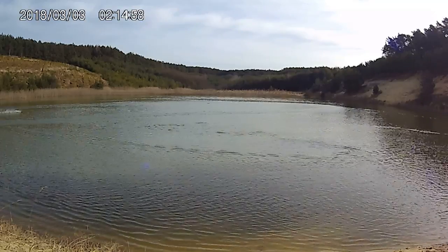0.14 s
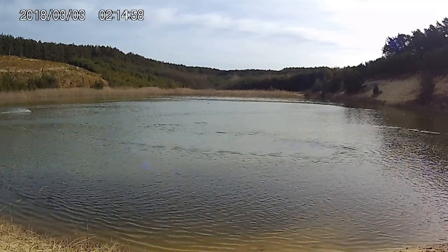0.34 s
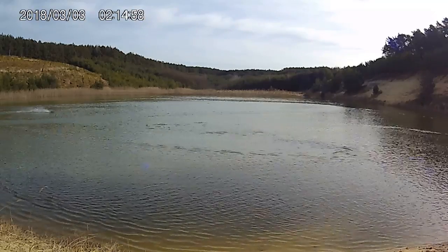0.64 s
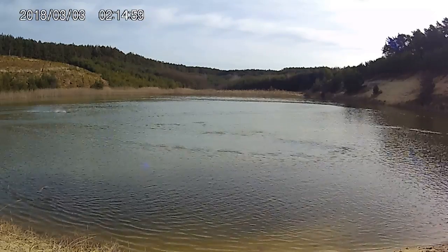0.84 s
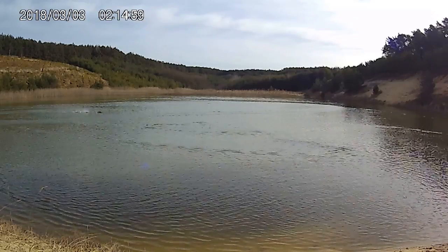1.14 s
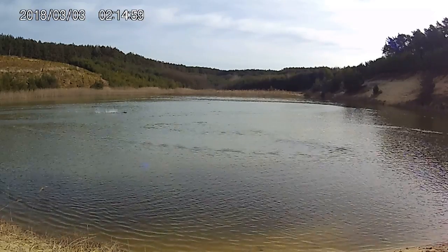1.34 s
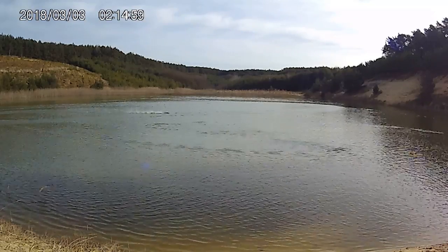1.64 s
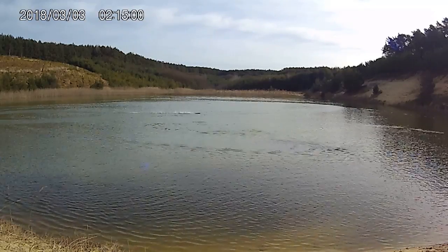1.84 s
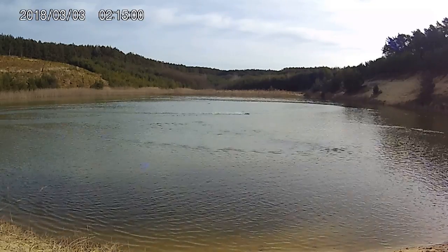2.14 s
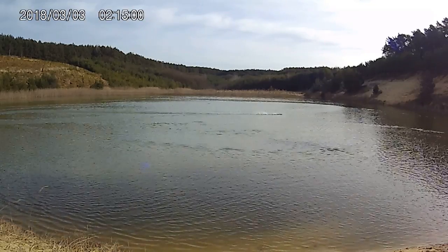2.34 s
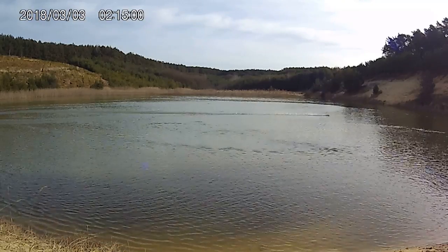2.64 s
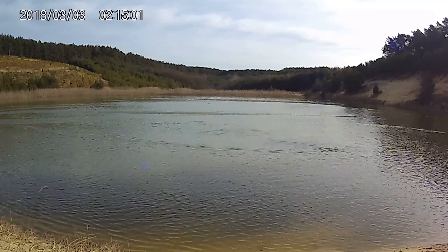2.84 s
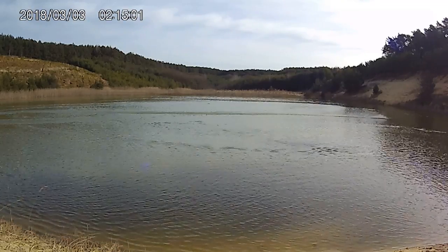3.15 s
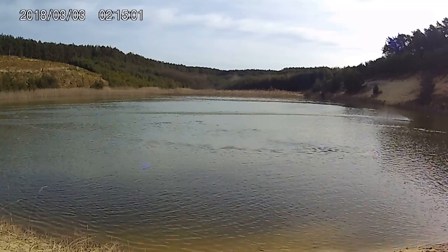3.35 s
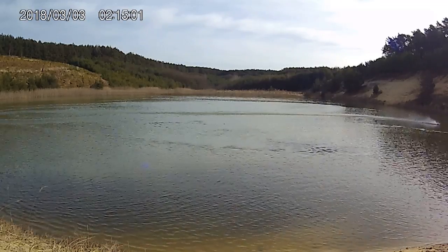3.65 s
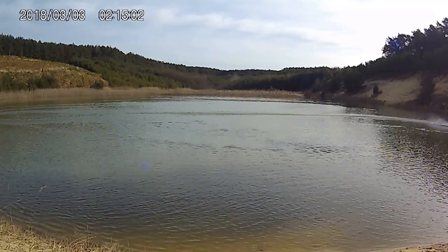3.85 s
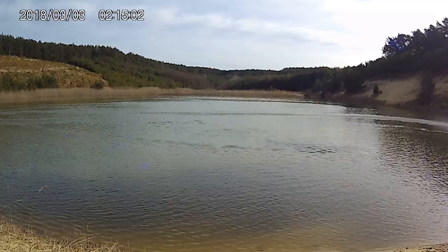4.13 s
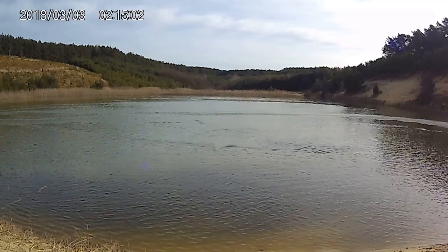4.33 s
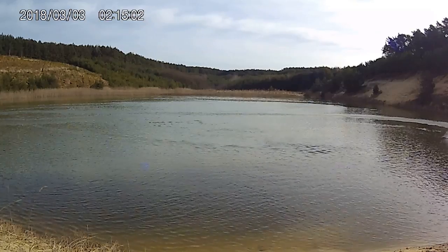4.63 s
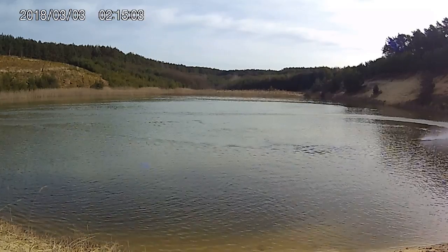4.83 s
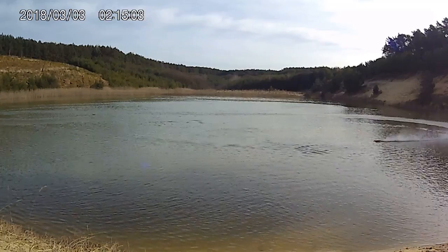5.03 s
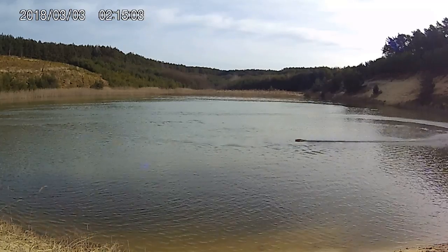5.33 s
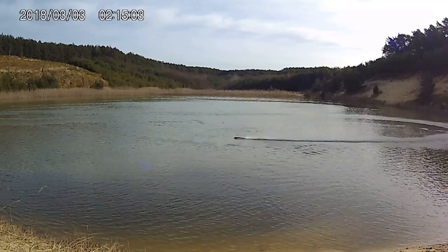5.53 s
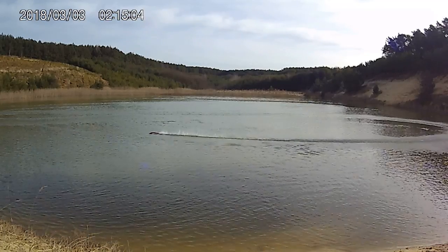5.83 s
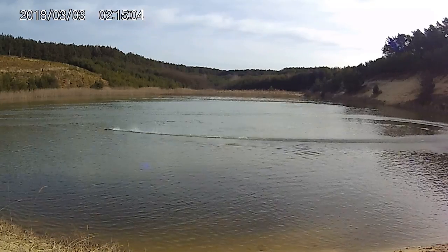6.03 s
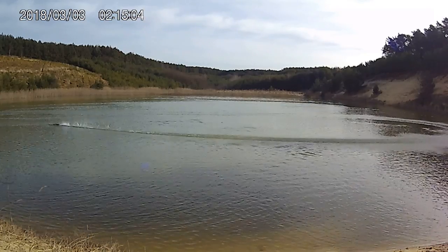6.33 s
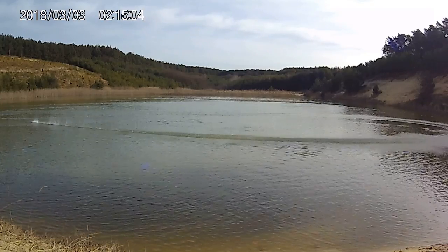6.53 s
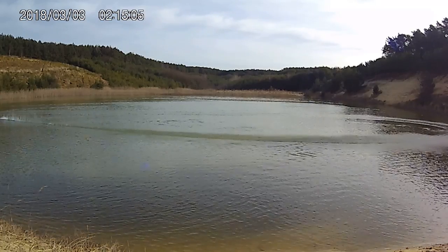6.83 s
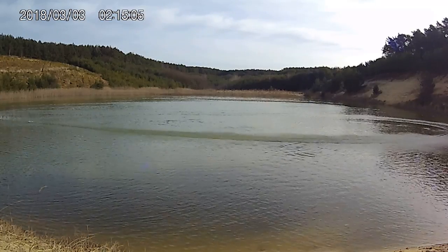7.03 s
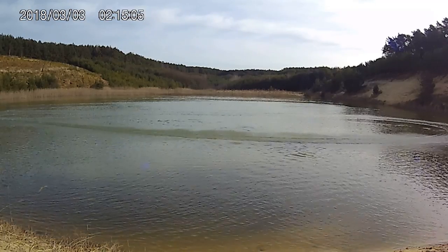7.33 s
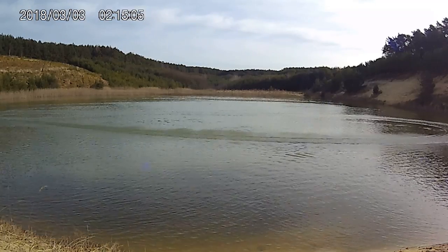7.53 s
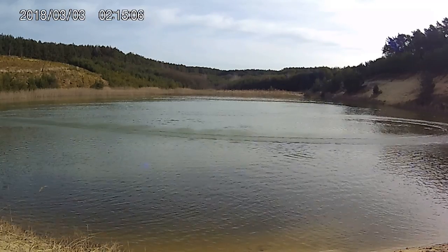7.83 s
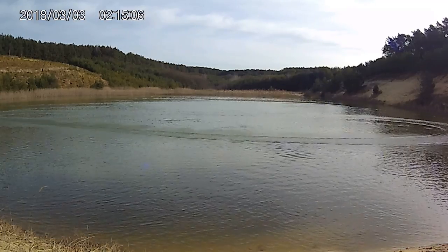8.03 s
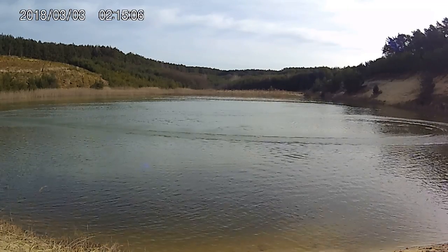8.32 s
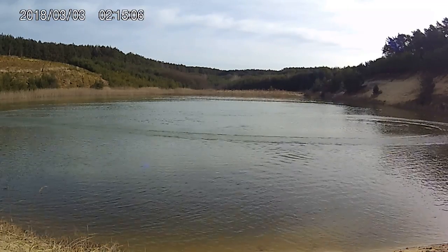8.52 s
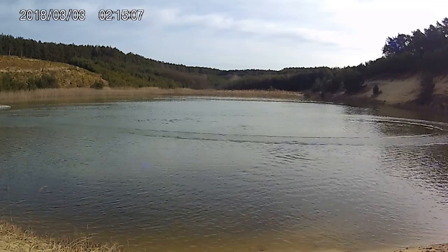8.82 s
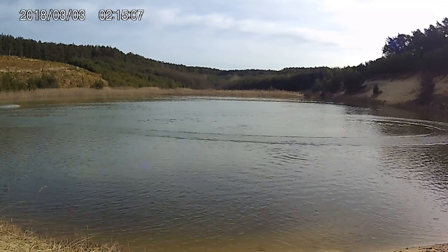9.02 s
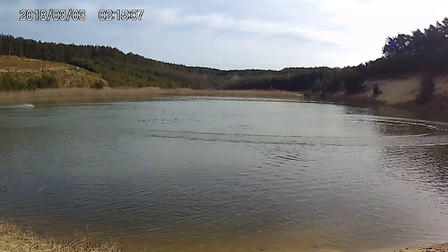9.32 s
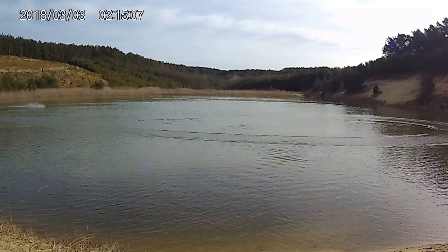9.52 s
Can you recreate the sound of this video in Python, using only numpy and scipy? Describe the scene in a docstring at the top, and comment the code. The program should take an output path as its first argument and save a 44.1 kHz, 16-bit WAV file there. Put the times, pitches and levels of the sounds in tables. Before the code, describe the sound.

Heard from a lake shore through a small camera microphone, a model boat's electric motor whines with a raspy, watery edge. It stutters rapidly as the hull hops, drops in pitch through a turn, then surges back louder and shriller as it passes nearest. It recedes to a low, faint drone and finally climbs again, over soft air hiss and a dull echo from the hills.

```python
"""On a lake among wooded hills, an electric model speedboat runs laps, heard from the shore through a small camera mic.
The half-submerged propeller whines at the shaft rate and its multiples; each blade stroke tears up noisy wash.
As the hull hops, the unloaded motor revs up, then the blades bite again with a splash and mostly a louder tone.
Droplets of spray patter as bright noise, the hills return a dull, scattered echo, and still air adds a soft hiss."""
import sys
import numpy as np
from scipy import signal
from scipy.fft import rfft, irfft, next_fast_len
from scipy.io import wavfile
from scipy.ndimage import uniform_filter1d

SR = 44100
rng = np.random.default_rng(int(sys.argv[2]) if len(sys.argv) > 2 else 0)


def wav_out(sig):
    """Save sig, one row per channel (or a flat mono array), as 16-bit PCM at SR to the path in sys.argv[1]."""
    wavfile.write(sys.argv[1], SR, np.round(np.clip(np.atleast_2d(sig).T, -1, 1) * 32767).astype(np.int16))


N = 426447
T = np.arange(N) / SR

# motor speed with the propeller in the water, slow in turns, fast on straights: t/s, shaft rate f/Hz
THROTTLE = [(0, 467), (.37, 495.4), (.55, 706.6), (.76, 701.6), (1.3, 743), (2.1, 793), (2.47, 771.7),
            (2.6, 536), (2.78, 428), (3.05, 564.4), (3.24, 611.6), (3.44, 546), (3.78, 529), (3.99, 570.3),
            (4.15, 652.5), (4.25, 654.5), (4.35, 711), (4.62, 750), (4.68, 734.4), (4.78, 669.3),
            (4.93, 646.6), (4.99, 734.4), (5.35, 757.8), (5.72, 781.5), (6.1, 765.4), (6.91, 748),
            (7.02, 611.4), (7.27, 611), (7.7, 507.4), (8.39, 484.9), (8.71, 504), (8.83, 541),
            (9.32, 558.6), (9.42, 693.7), (9.67, 722)]
# the boat comes and goes: t/s, boat level/dB, tones against wash level/dB, shaft tone gain level/dB
PASSES = [(0, -44, -1, -0.5), (.75, -42, 1.5, -6), (1.25, -41.5, -6, 5.5), (1.6, -39.5, 2, 0),
          (2.55, -39, -1.5, 2), (2.82, -45, -3.5, -9.5), (3.2, -39, 1.5, 5), (3.55, -38.5, -5, -8.5),
          (4.2, -41.5, 1, -11), (4.5, -32.5, -3.5, -5), (4.88, -36, 1, -3), (5.15, -30.5, 1.5, -13.5),
          (5.45, -31, -2, 2.5), (5.75, -34.5, -2.5, 4), (6.5, -41.5, -2.5, 2.5), (7.0, -41, -3.5, -0.5),
          (7.5, -45, 0, -10.5), (7.8, -45, -6.5, -4.5), (8.6, -45.5, -4.5, -0.5), (8.85, -44.5, 0.5, -0.5),
          (9.28, -45, -7, 6.5), (9.67, -44.5, 7.5, -12.5)]
# shrillest where the boat heads for the shore: t/s, upper orders gain level/dB, wash treble gain level/dB
HEADING = [(0, -18, -2.5), (.5, -4, -5), (.95, 0, 3.5), (1.75, -6.5, 2), (2.45, 0, -7.5), (2.9, 3, -6),
           (3.3, 6, 0), (3.75, 6, 12), (4.15, 3, 6.5), (4.6, 8, 3.5), (5.2, 4.5, -2.5), (5.7, 0.5, 1),
           (6.3, 1, 7.5), (6.9, -0.5, 9.5), (7.7, -8.5, -1.5), (8.6, -5.5, -2), (9.2, -2.5, -6),
           (9.67, 0, 7.5)]
# blades biting into the water, mostly after a hop of the hull:
# bite start t/s, bite end t/s, rev-up before it f/Hz, tone gain level/dB, splash gain level/dB, roughness (0-1)
HOPS = [(0.212, .242, 0, 10, -6.5, 0.14), (0.841, 0.897, 160, 5, 5.5, .4), (.93, 0.998, 130, 4.5, 6, 0.54),
        (1.043, 1.08, 89.5, 13.5, 4.5, 0.37), (1.118, 1.176, 124.5, 11, 6, 0.6),
        (1.265, 1.367, 220, 17, 9, 0.32), (1.379, 1.404, 55, 12.5, 7, .45),
        (1.5, 1.592, 215, 11.5, 7.5, 0.24), (1.638, 1.735, 85, 11, 10, 0.46),
        (1.829, 1.94, 160, 15.5, 6, 0.17), (1.973, 2.02, 105, 14.5, 11, .4),
        (2.062, 2.229, 88, 12.5, 10.5, 0.6), (2.317, 2.382, 170, 15, 10.5, 0.39),
        (2.428, 2.491, 92.5, 15, 5.5, 0.22), (2.581, 2.87, -2, -1, 3, 0.26), (2.917, 2.956, 10, 7, 4, .05),
        (3.057, 3.19, 0, 3, 0, 0.04), (3.244, 3.32, 8, 3, 5, 0.21), (4.12, 4.255, 0, 8, 6, 0),
        (4.294, 4.328, 58, 4.5, 5, 0.11), (4.393, 4.408, 88, -3.5, 1.5, 0.12),
        (4.481, 4.499, 108.5, -9.5, 3.5, .1), (4.556, 4.57, 78, 2.5, -1, 0.2),
        (4.574, 4.606, 0, 12.5, -4.5, 0.02), (4.65, 4.687, 82, 1, 2, 0.06),
        (4.693, 4.855, 0.5, 5.5, 3, 0.01), (4.909, 4.946, 42, -1.5, 2.5, .05),
        (5.008, 5.027, 82, 12.5, 1.5, 0.1), (5.072, 5.097, 91.5, 0.5, 10, .25),
        (5.129, 5.158, 41.5, 6.5, -4, .05), (5.201, 5.248, 31, 5.5, -2, 0.11),
        (5.293, 5.317, 32, 9, -3, 0.1), (5.417, 5.448, 42.5, -3, -3.5, .2),
        (5.502, 5.52, 24.5, 2.5, -1.5, .2), (5.578, 5.586, 78.5, 14, -3, 0),
        (5.643, 5.667, 55, 19.5, -7, .2), (5.858, 5.936, 55, 13.5, 3.5, .1),
        (5.967, 6.007, 80.5, 15.5, 2.5, 0.21), (6.075, 6.172, 134.5, 17.5, 7, 0.02),
        (6.221, 6.317, 54, 17, 7.5, 0.03), (6.352, 6.39, 52.5, 14, 5, 0.08),
        (6.432, 6.477, 54.5, 20, 4.5, 0.12), (6.582, 6.648, 160, 16.5, 6.5, 0.01),
        (6.677, 6.695, 25, 10, -1, 0.14), (6.751, 6.832, 85, 13.5, 1.5, 0.23),
        (6.869, 6.967, 69.5, 15, 1.5, 0), (7.148, 7.201, 66, -1, 3, 0.18), (7.274, 7.307, 32, 9, -6, 0.1),
        (7.343, 7.38, -0.5, 6.5, -4, .12), (7.538, 7.583, 19, 3, 4, 0.09), (8.43, 8.494, 14.5, 6.5, 5.5, 0),
        (8.801, 8.86, 8, 4.5, 1, .05), (9.444, 9.488, 39, 4, 7, .15), (9.58, 9.621, 60.5, 2.5, 7, .3)]
# upper orders of the whine: multiple of the shaft rate, level/dB
OVERTONES = [(5, -6.5), (6, -8.5), (7, -11.5), (8, -12), (9, -14.5)]
# how well the hull radiates each tone: f/Hz, level/dB
HULL_RESONANCES = [(450, -28), (550, -21), (620, -19), (700, -14), (780, -8), (870, -4), (980, -7),
                   (1100, 0.5), (1300, 2), (1520, -1), (1750, -5), (2050, 2.5), (2350, -2.5), (2700, -4),
                   (3100, -3.5), (3600, -11.5)]
# tone colour of the upper orders: f/Hz, level/dB
OVERTONE_COLOUR = [(2000, -1), (2750, 2), (3250, -15.5), (3550, -14), (4000, -12), (4300, -19),
                   (4650, -32.5), (5400, -42.5), (6000, -63)]
# relative noise spectra of the wash, the spray and the still air: f/Hz, level/dB per Hz
WASH_COLOUR = [(150, -64), (350, -44), (500, -30), (700, -10.5), (1000, -3), (1400, 3), (2050, 4.5),
               (2500, 0), (3100, -1.5), (3500, -15.5), (4100, -22.5), (4500, -27), (5400, -36), (6100, -67)]
SPRAY_COLOUR = [(4000, -12.5), (5400, 9.5), (6000, -13.5), (6500, 5), (7100, 0), (8000, -19.5), (8800, -3),
                (9600, 1.5), (11000, 6), (12500, 0), (15500, -10.5)]
AIR_COLOUR = [(20, -16), (60, -4.5), (87, -4), (110, -5.5), (210, -2), (400, 6), (1000, 13.5), (4000, -14),
              (7000, -27)]

FULL_SPEED_HZ = 800  # shaft rate that counts as full speed
FREE_REV_HZ = 107  # rev-up at which the propeller is wholly clear of the water
AIR_S = .075  # longest time in the air for a hop with a 160 Hz rev-up
TOUCH_S = 0.01177  # the blade tips touch the water this long before they bite
BRAKE_S = .035  # time constant of the water braking the motor
SPRAY_DB, SPRAY_DB_PER_OCTAVE = -48, 3  # against the boat's level at full speed, and growth with speed
AIR_DB = -67
CUT_HZ = 15700


def undb(db):
    """Decibels to gain."""
    return 10 ** (np.asarray(db) / 20)


def unit(x):
    """Scale to rms 1."""
    return x / np.sqrt(np.mean(x ** 2))


def ramp(x):
    """Smooth step from 0 to 1."""
    return np.sin(np.pi / 2 * np.clip(x, 0, 1)) ** 2


def curves(table):
    """Draw each column after the time as an automation curve, one value per sample."""
    s, *columns = np.transpose(table)
    return [np.interp(T, s, column) for column in columns]


def gain_at(hz, colour):
    """Gain of a spectrum table at the given frequencies, read along a log frequency axis."""
    f, db = np.transpose(colour)
    return undb(np.interp(np.log(hz + 1), np.log(f), db))


def shape(x, response):
    """Filter x by a gain that is a function of frequency."""
    size = next_fast_len(N + 4096)
    spectrum = rfft(x, size) * response(np.fft.rfftfreq(size, 1 / SR))
    return irfft(spectrum, size)[:N]


def noise(colour, envelope=1):
    """Noise of the given spectrum, excited through an envelope that sets its rms."""
    mean_gain = np.sqrt(np.mean(gain_at(np.fft.rfftfreq(N, 1 / SR), colour) ** 2))
    excitation = envelope * rng.standard_normal(N)
    return shape(excitation, lambda f: gain_at(f, colour)) / mean_gain


def wander(hz):
    """Smooth random drift that moves up to about hz times a second, at rms 1."""
    step = 16  # drawn at a reduced rate
    lowpass = signal.butter(3, hz, fs=SR / step, output="sos")
    slow = signal.sosfilt(lowpass, rng.standard_normal(N // step + 2))
    return np.interp(T, np.arange(len(slow)) * step / SR, unit(slow))


def shaft_rate(steady_hz, chatter=.013, shake=0.007996):
    """Shaft rate in Hz as shaken by ripples, which load the propeller more unevenly at speed."""
    ripples = chatter * wander(19.93) + shake * wander(44.9)
    return steady_hz * (1 + (steady_hz / FULL_SPEED_HZ) ** 2 * ripples)


def order_levels(hz, tone_db, shaft_db, shrill_db, bite_db, bow_on_db=3,
                 third_share=0.53, third_bite=0.2, fourth_share=.9, fourth_bite=0.62):
    """Levels (dB) of the first four orders as they slide over the hull's resonances."""
    shaft, blade, third, fourth = (
        tone_db + 20 * np.log10(gain_at(k * hz, HULL_RESONANCES)) for k in range(1, 5))
    # a bite lifts the even orders, as the propeller has two blades; heard bow on, it favours the third
    bow = ramp((shrill_db - bow_on_db) / 2)
    shaft = shaft + shaft_db
    blade = blade + (1 - bow) * bite_db
    third = third + third_share * shrill_db + np.maximum(bow, third_bite) * bite_db
    fourth = fourth + fourth_share * shrill_db + fourth_bite * (1 - bow / 2) * bite_db
    return shaft, blade, third, fourth


def partial(turns, multiple, flutter, rough):
    """One order of the shaft at rms 1: waves make it flutter, air sucked into the blades tears it up."""
    along, across = (flutter * wander(35) + rough * wander(150) for _ in range(2))
    angle = 2 * np.pi * multiple * turns
    tone = (1 + along) * np.sin(angle) + across * np.cos(angle)
    return tone / np.sqrt(.5 + flutter ** 2 + rough ** 2)


def whine(hz, turns, order_db, torn, upper_db, speed_db_per_octave=4):
    """Shaft and blade tones with their overtones; a bite roughens the upper ones most."""
    shaft_db, blade_db, third_db, fourth_db = order_db
    rough = .1 + torn
    out = undb(shaft_db + 2.04) * partial(turns, 1, flutter=0.3, rough=0.0057)
    out += undb(blade_db - 1.17) * partial(turns, 2, flutter=0.45, rough=rough)
    out += undb(third_db - 0.87) * partial(turns, 3, flutter=0.71, rough=2 * rough)
    out += undb(fourth_db - 4.0) * partial(turns, 4, flutter=0.59, rough=2 * rough)
    upper_db = upper_db + speed_db_per_octave * np.log2(hz / FULL_SPEED_HZ)
    for multiple, db in OVERTONES:
        gain = undb(upper_db + db) * gain_at(multiple * hz, OVERTONE_COLOUR)
        out += gain * partial(turns, round(multiple), flutter=.9, rough=.7 * multiple * rough)
    # the small hull radiates no bass, and the highest whine is lost on the way
    band = signal.butter(10, [380, 5300], "bandpass", fs=SR, output="sos")
    return signal.sosfilt(band, out)


def wash(turns, hz, level_db, churn_db=3.0, stroke_depth=0.94):
    """Water torn up by each blade stroke, in gulps that grow more uneven with speed."""
    strokes = unit(1 + stroke_depth * np.cos(2 * np.pi * 2 * turns))  # two blades per turn
    gulps_db = churn_db * (hz / FULL_SPEED_HZ) ** 2 * wander(100)
    water = noise(WASH_COLOUR, strokes * undb(level_db + gulps_db))
    treble = shape(water, lambda f: 1 / (1 + (3400 / (f + 1)) ** 8))
    treble_db = curves(HEADING)[1]
    return water + (undb(treble_db) - 1) * treble


def spray(level_db, hz, splash_db, patter_db=4, gust_db=1.5, treble_share=0.38):
    """Droplets patter down behind the boat, in gusts, thicker at speed and with stronger splashes."""
    thrown_db = SPRAY_DB + SPRAY_DB_PER_OCTAVE * np.log2(hz / FULL_SPEED_HZ)
    thrown_db = thrown_db + treble_share * curves(HEADING)[1] + 0.5 * splash_db
    flicker_db = gust_db * wander(25) + patter_db * wander(700)
    return noise(SPRAY_COLOUR, undb(level_db + thrown_db + flicker_db))


def still_air():
    """Soft, steady noise of the air over the lake."""
    return noise(AIR_COLOUR, undb(AIR_DB))


def hills(x, t60=3.0, onset_s=0.026, dull_hz=3000):
    """Trees and banks scatter a late, soft and dull echo: a decaying noise tail, low-passed."""
    t = T[:2 * SR]
    scatter = rng.standard_normal(len(t)) * np.minimum(t / onset_s, 1) * undb(-60 * t / t60)
    echo = signal.fftconvolve(x, scatter / np.linalg.norm(scatter))[:N]
    return shape(echo, lambda f: 1 / (1 + (f / dull_hz) ** 4))


def biting(attack_s=0.0025, release_s=0.005, splash_rise_s=0.025, splash_s=0.018):
    """Blade gain (dB) and roughness hold while the propeller is buried; the splash (dB) flares on entry."""
    t = T[::32]  # control rate
    blade_db, splash_db, torn = 0, 0, 0
    for start, end, _, bite_db, hit_db, rough in HOPS:
        since = t - start
        buried = ramp(since / attack_s + 0.94) * ramp((end - t) / release_s + .5)
        blade_db = blade_db + bite_db * buried
        torn = torn + rough * buried
        flare = ramp(since / splash_rise_s + 0.66) * np.exp(-(since / splash_s) ** 2)
        splash_db = splash_db + hit_db * flare
    return [np.interp(T, t, control) for control in (blade_db, splash_db, torn)]


def rev_up(lift_off_s=.008):
    """Extra shaft rate in Hz: the unloaded motor speeds up until touch-down, then the water brakes it."""
    t = T[::32]  # control rate
    rev, last_end = 0, -1
    for start, end, rev_hz, *_ in HOPS:
        # a small hop is over sooner than a high one
        longest_s = AIR_S * (.35 + .65 * rev_hz / 160)
        air_s = np.clip(start - last_end - lift_off_s, .02, longest_s)
        since = t - start + TOUCH_S
        rise = np.sin(np.pi / 2 * np.clip(1 + since / air_s, 0, 1))
        brake = np.exp(-(np.maximum(since, 0) / BRAKE_S) ** 2)
        rev = rev + rev_hz * rise * brake
        last_end = end
    return np.interp(T, t, rev)


def scene(lift_db=-1.0, lift_shrill_db=-4, grit_db=3):
    """The boat, its echo and the still air over the lake."""
    loaded_hz = uniform_filter1d(curves(THROTTLE)[0], size=1300)
    rev_hz = rev_up()
    hz = shaft_rate(loaded_hz + rev_hz)
    turns = np.cumsum(hz) / SR
    level_db, tone_db, shaft_db = curves(PASSES)
    bite_db, splash_db, torn = biting()

    # wash and upper orders thin while the propeller is in the air
    airborne = np.minimum(rev_hz / FREE_REV_HZ, 1) ** 2
    wash_db = level_db + lift_db * airborne
    shrill_db = curves(HEADING)[0] + lift_shrill_db * airborne

    order_db = order_levels(loaded_hz + rev_hz, level_db + tone_db, shaft_db, shrill_db, bite_db)
    boat = whine(hz, turns, order_db, torn, wash_db + shrill_db - 0.5)
    boat += wash(turns, loaded_hz, wash_db + 1.0 * splash_db + 0.12 * bite_db - 5.0)
    # a propeller that gulps air chops tones and wash together
    boat *= undb(grit_db * torn * (wander(52) + 0.52))

    droplets = spray(level_db, loaded_hz, splash_db)
    echo = undb(-15) * hills(boat)
    return (boat + droplets + echo + still_air())[None]


def record(dry):
    """The camera cuts the top with a steep low-pass."""
    lowpass = signal.ellip(8, .2, 70, CUT_HZ, fs=SR, output="sos")
    return signal.sosfilt(lowpass, dry)


dry = scene()
out = record(dry)
wav_out(out)
```